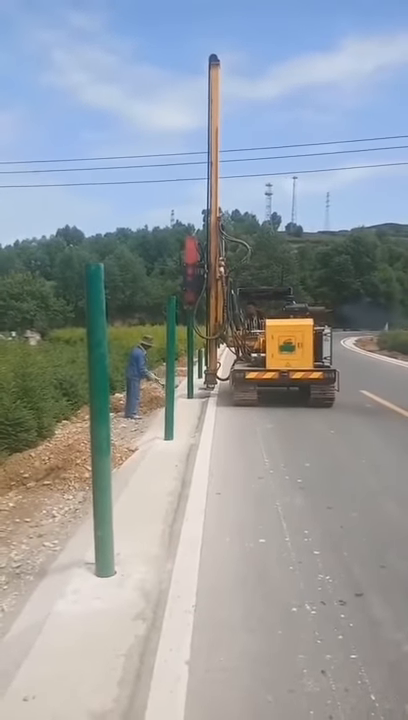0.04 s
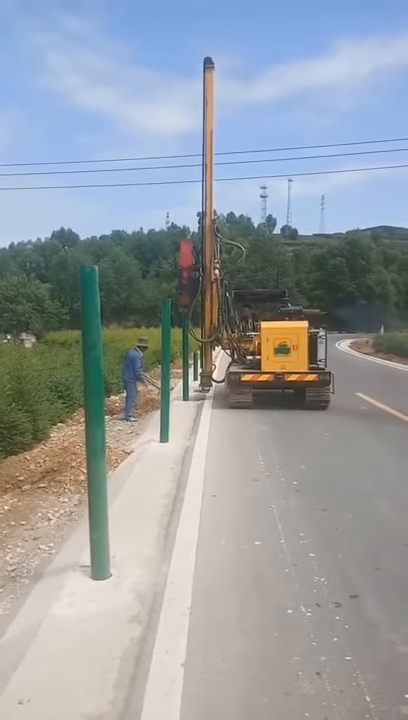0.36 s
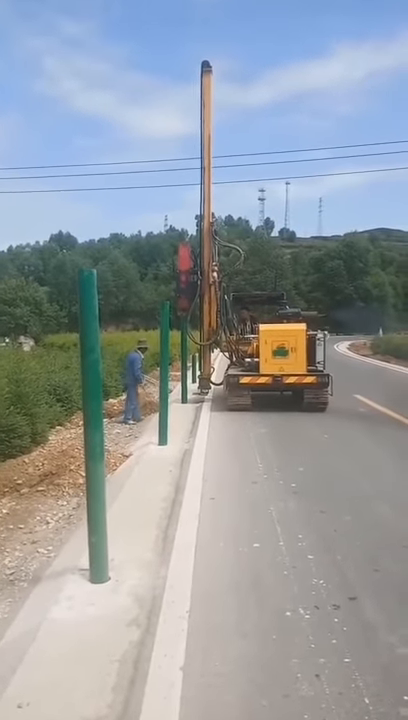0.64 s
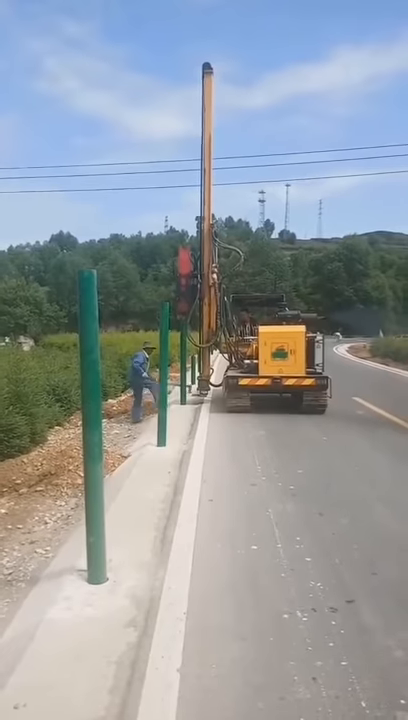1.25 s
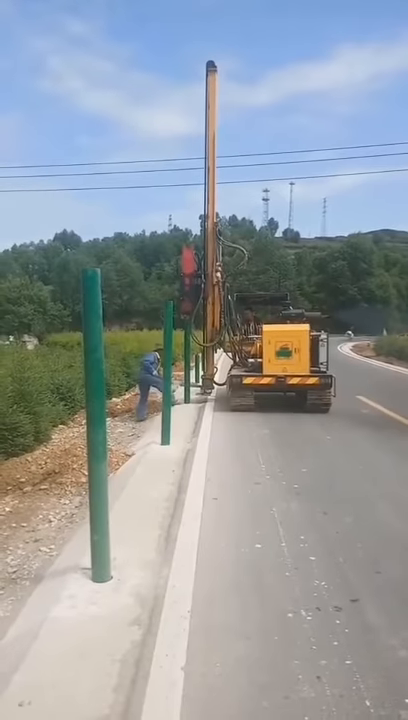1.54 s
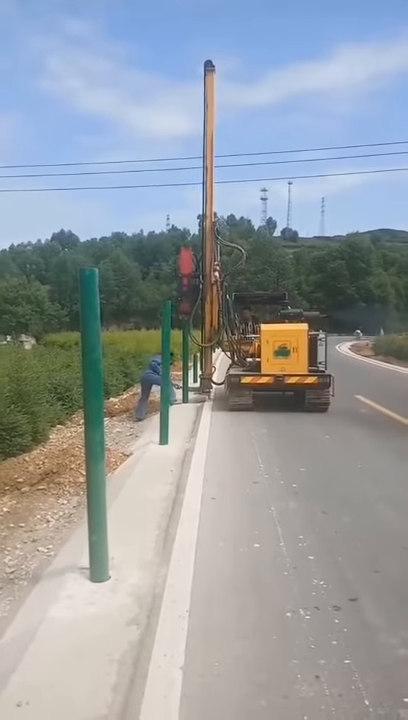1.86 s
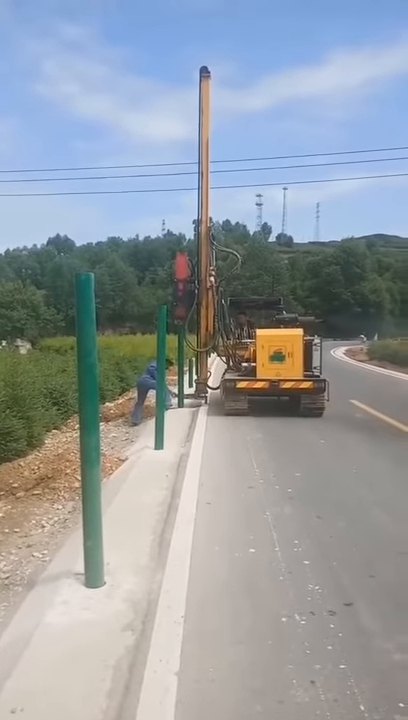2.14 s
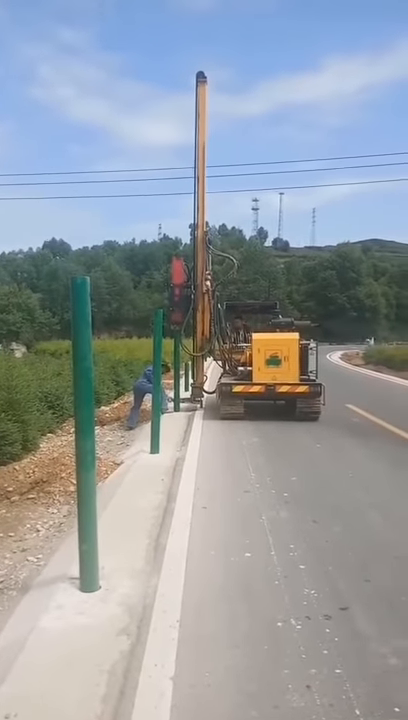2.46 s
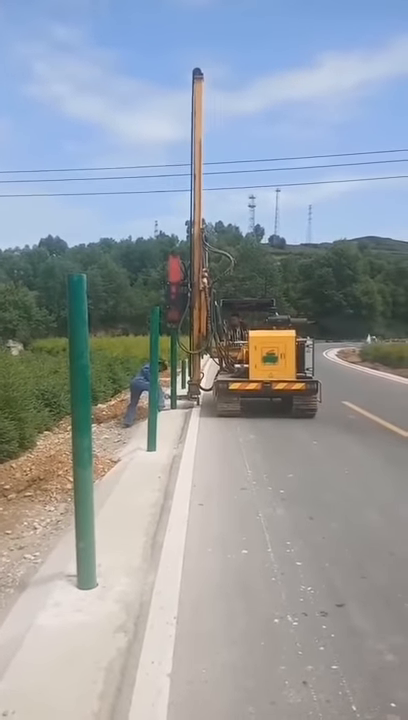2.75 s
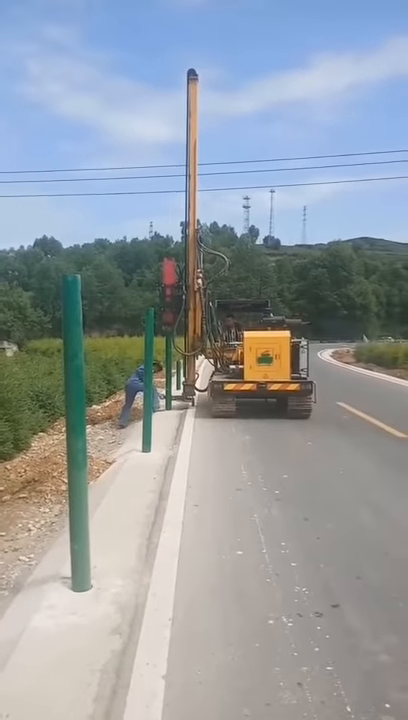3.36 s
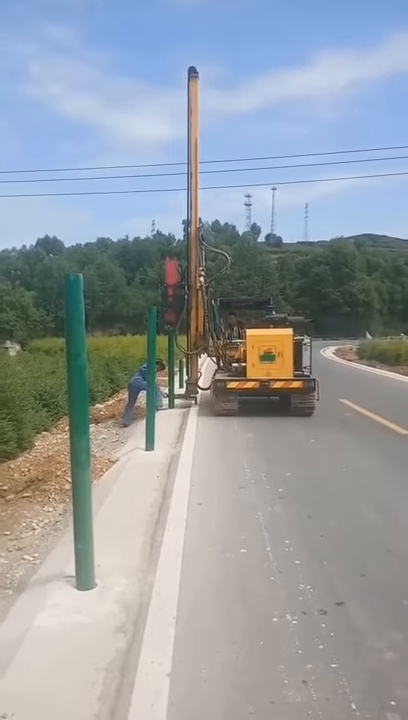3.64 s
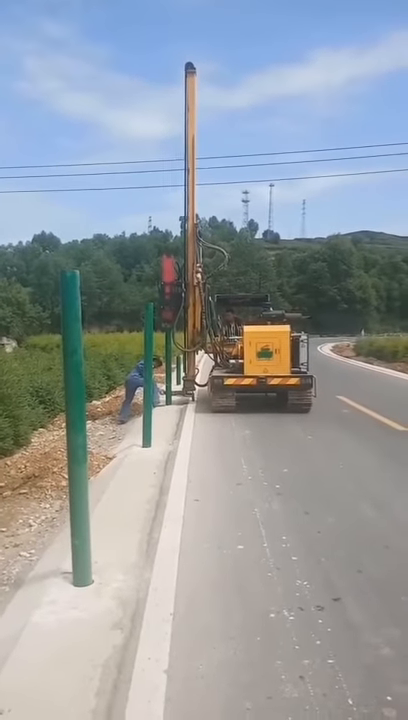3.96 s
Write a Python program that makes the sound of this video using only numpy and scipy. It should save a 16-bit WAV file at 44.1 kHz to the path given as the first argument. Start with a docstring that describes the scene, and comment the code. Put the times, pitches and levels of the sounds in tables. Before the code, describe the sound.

A hydraulic post driver hammers rapidly on a steel post over running diesel engines.

```python
"""Post driver at the roadside

Some way off, straight ahead of the microphone, a hydraulic rig drives a steel tube post, about ten
blows a second. Each blow cracks, clatters through post and mast, and lets a 1 kHz ring swell until
the next blow chokes it. Behind it two diesels rev up and settle over the rush of the hydraulics.
The recorder's limiter ducks everything at the blows."""
import sys
import numpy as np
from scipy import signal
from scipy.fft import rfft, irfft
from scipy.io import wavfile
from scipy.ndimage import uniform_filter1d

SR = 44100
rng = np.random.default_rng(int(sys.argv[2]) if len(sys.argv) > 2 else 0)


def store_wav(level_fs):
    """Save 16-bit WAV to argv[1]."""
    pcm = np.round(np.clip(np.atleast_2d(level_fs), -1, 1) * 32767)
    wavfile.write(sys.argv[1], SR, pcm.T.astype(np.int16))


N = 176400
TIME = np.arange(N) / SR

# Hammer blows. Each row: start in seconds, relative strength in dB, relative level of the ring in dB.
HAMMER_BLOWS = [(-0.055, 0.0, -19.5), (0.0574, -0.7, -19), (0.17, -3.3, -18), (0.2792, -4, -13.5),
                (0.3867, -1, -11), (0.4938, -1.5, -10.5), (0.5981, -3.5, -15.5), (0.7012, 1, -9),
                (0.8035, 0, -12), (0.9044, -2, -11.5), (1.005, -7.5, -12), (1.1086, -4, -12),
                (1.2098, -8, -17), (1.3109, -7.5, -16), (1.4123, -3.5, -23), (1.5124, -9, -22),
                (1.6104, -6, -21.0), (1.7079, -3, -16.5), (1.7966, -22.5, -19), (1.8812, -5.5, -15),
                (1.9802, -3, -23.5), (2.0762, -7.5, -24.5), (2.1768, -4.5, -18), (2.2729, -0.9, -16.0),
                (2.3721, -5.5, -16.5), (2.4692, -6, -17.0), (2.5661, -4.5, -17.5), (2.6638, -6.5, -17.0),
                (2.7621, -4, -20.5), (2.8587, -7.5, -28.5), (2.9557, -4.5, -26), (3.0522, -8.5, -22.0),
                (3.1498, -5, -20.5), (3.2472, -6.3, -22.0), (3.3423, -5, -17.5), (3.44, -0.5, -20),
                (3.537, -5.5, -29), (3.6349, -7.5, -20.5), (3.7313, 1, -20), (3.829, -2.5, -13.5),
                (3.9257, -2.2, -12.5)]
# Lasting modes of the steel. Each entry: pitch in Hz.
STEEL_MODES_HZ = [890, 2330, 2715, 2790, 4150, 5185, 5368, 5727]
# Colour of clattering steel. Each row: frequency in Hz, relative spectral density in dB.
CLATTER_SPECTRUM = [(300, -9.5), (500, -16), (750, -3.5), (1000, 6), (1300, -5), (1650, -9.5), (2100, -1),
                    (3000, -2), (3800, -5.5), (4500, -4), (5500, -4.5), (6300, -18.5)]


def from_db(db):
    """Decibels to gain."""
    return 10 ** (np.asarray(db) / 20)


def rms_one(x):
    """Scale to unit rms."""
    return x / np.sqrt(np.mean(x ** 2) + 1e-20)


def in_time(rows):
    """The columns of a curve at every sample."""
    times, *columns = np.transpose(rows)
    return [np.interp(TIME, times, column) for column in columns]


def noise(spectrum):
    """Noise of unit rms with the given colour."""
    hz, db = np.transpose(spectrum)
    bins = np.maximum(np.arange(N // 2 + 1) * SR / N, 1)
    colour = from_db(np.interp(np.log(bins), np.log(hz), db))
    return rms_one(irfft(rfft(rng.standard_normal(N)) * colour, N))


def drift(hz):
    """A random wander of unit rms, mostly slower than hz."""
    bins = np.arange(N // 2 + 1) * SR / N
    return rms_one(irfft(rfft(rng.standard_normal(N)) / (1 + (bins / hz) ** 2), N))


def mode(clicks, hz, t60):
    """A unit click sets a sine of height 1 ringing."""
    r, w = np.exp(-np.log(1000) / (t60 * SR)), 2 * np.pi * hz / SR
    return signal.lfilter([0, np.sin(w)], [1, -2 * r * np.cos(w), r * r], clicks + 1e-18)


def strikes(times, gains):
    """A click of the given size at each time."""
    out, inside = np.zeros(N), (times >= 0) & (times < (N - 1) / SR)
    out[(times[inside] * SR).astype(int)] = gains[inside]
    return out


def engine_lines(hz, orders, waver_db):
    """Engine tones on multiples of a rate, each wavering in level."""
    turn = 2 * np.pi * np.cumsum(hz) / SR
    out = np.zeros(N)
    for multiple, db in orders:
        height = np.sqrt(2) * from_db(db + waver_db * drift(2.7))
        out += height * np.sin(multiple * turn + rng.uniform(0, 2 * np.pi))
    return out


def hammer_impacts():
    """Every blow strikes the steel's short and lasting modes, each a little differently."""
    # Short modes. Each row: pitch in Hz, relative level in dB, t60 in seconds, delay in seconds.
    crack_modes = [(734, -22, 0.058, 0.00015), (1017, -2.5, 0.016, 0.00074), (1280, -4, 0.0053, .0009),
                   (1982, -7.5, 0.018, 0.0012), (2310, -6.5, 0.011, 0.001174), (3242, -13.5, 0.036, 0.0051),
                   (2873, -6.5, 0.011, .0042), (4158, -15.5, 0.028, 0.0019), (5470, -21, 0.019, .004),
                   (2970, -21, 0.071, .007)]
    # Lasting modes, as in STEEL_MODES_HZ. Each row: relative level in dB, t60 in seconds.
    steel_decays = [(-30.5, 0.31), (-35, 0.16), (-30.5, 0.35), (-19, 0.074), (-31, 0.28), (-37, 0.44),
                    (-31.5, 0.16), (-47.5, 0.49)]
    jitter_s, steel_delay_s = 0.00015, 0.0037
    starts, blow_db, _ = np.transpose(HAMMER_BLOWS)
    out = np.zeros(N)
    for k, (hz, level_db, t60, delay) in enumerate(crack_modes):
        size, late = rng.standard_normal((2, len(starts)))
        arrivals = starts + delay + (jitter_s + 0.14 * delay) * late  # later modes scatter more
        clicks = strikes(arrivals, from_db(blow_db + level_db + 3 * size))
        out -= (-1) ** k * mode(clicks, hz, t60)  # polarity alternates from mode to mode
    for hz, (level_db, t60) in zip(STEEL_MODES_HZ, steel_decays):
        size, late = rng.standard_normal((2, len(starts)))
        arrivals = starts + steel_delay_s + jitter_s * late
        out += mode(strikes(arrivals, from_db(blow_db + level_db + 5 * size)), hz, t60)
    return out


def mast_clatter():
    """Hammer and mast clatter after each blow: a quick, grainy burst and a longer tail."""
    rise_s, grain_db = 0.0037, 1
    starts, blow_db, _ = np.transpose(HAMMER_BLOWS)
    hit_power = strikes(starts, from_db(2 * blow_db))
    power = 0
    for level_db, t60 in ((-10, 0.06), (-13.5, 0.15)):  # burst, tail
        decay = np.exp(-2 * np.log(1000) / (t60 * SR))
        power += from_db(2 * level_db) * signal.lfilter([1], [1, -decay], hit_power + 1e-18)
    rise = np.exp(-1 / (rise_s * SR))
    envelope = np.sqrt(signal.lfilter([1 - rise], [1, -rise], power))
    return envelope * from_db(grain_db * drift(200)) * noise(CLATTER_SPECTRUM)


def post_ring():
    """The post's main tone swells after each blow and is choked as the hammer lands again."""
    ring_hz, t60, waver_db, slip_rad = 972.5, 1, 1.16, 0.59
    wait_s, swell_s, choke_s = 0.009, 0.055, 0.026
    starts, _, ring_db = np.transpose(HAMMER_BLOWS)
    ends = np.append(starts[1:], 2 * starts[-1] - starts[-2])
    blow = np.maximum(np.searchsorted(starts, TIME, side="right") - 1, 0)
    age = TIME - starts[blow]
    swell = np.sin(np.pi / 2 * np.clip((age - wait_s) / swell_s, 0, 1))
    decay = np.exp(-np.log(1000) * age / t60)
    choke = np.clip((ends[blow] - TIME) / choke_s, 0, 1)
    # The phase wanders, and jumps at each blow.
    slip = slip_rad * (drift(12) + 2 * rng.standard_normal(len(starts))[blow])
    tone = np.sqrt(2) * np.sin(2 * np.pi * ring_hz * TIME + slip)
    return from_db(2.5 + ring_db[blow] + waver_db * drift(52)) * swell * decay * choke * tone


def cap_scrape():
    """The hammer rubs the post cap as it comes down, with a different strength each time."""
    lead_s, fade_s = 0.00065, 0.0027
    starts = np.transpose(HAMMER_BLOWS)[0]
    rubs = strikes(starts - lead_s, from_db(3 * rng.standard_normal(len(starts))))
    lag = np.arange(-SR // 20, SR // 20 + 1) / SR
    envelope = signal.fftconvolve(rubs, np.exp(-np.abs(lag) / fade_s), "same")
    return from_db(-21.5) * envelope * noise(CLATTER_SPECTRUM)


def valve_spit():
    """The valve gives a short bright spit just before each blow."""
    lead_s, jitter_s, fade_s = 0.021, 0.00091, 0.0054
    centre_hz, width_hz = 5190, 2000
    starts = np.transpose(HAMMER_BLOWS)[0]
    size, late = rng.standard_normal((2, len(starts)))
    spits = strikes(starts - lead_s + jitter_s * late, from_db(4.6 * size))
    lag = np.arange(-SR // 20, SR // 20 + 1) / SR
    envelope = signal.fftconvolve(spits, np.exp(-(lag / fade_s) ** 2), "same")
    hiss = rms_one(mode(rng.standard_normal(N), centre_hz, t60=np.log(1000) / np.pi / width_hz))
    return from_db(-27) * envelope * hiss


def loose_parts():
    """Loose parts tick at random throughout, each tick on one of the steel's modes."""
    ticks_per_s = 360
    ticking = rng.random(N) < ticks_per_s / SR
    ticks = ticking * from_db(-36.5 + 3 * np.minimum(rng.exponential(1, N), 4))
    struck = rng.integers(0, len(STEEL_MODES_HZ), N)
    return sum(mode(ticks * (struck == k), hz, t60=0.03) for k, hz in enumerate(STEEL_MODES_HZ))


def revving_diesel():
    """The higher engine hums on its firing rate, which climbs and then holds."""
    # The run-up. Each row: time in seconds, firing rate in Hz, level in dB.
    revs = [(0, 108.7, -33.5), (.3, 111.7, -33), (.75, 120.6, -30.5), (1.05, 128.9, -40.5),
            (1.35, 136, -34.5), (1.7, 144.2, -41.5), (2.9, 144, -39), (4, 143.5, -35.5)]
    # Its tones. Each row: multiple of the firing rate, relative level in dB.
    orders = [(.5, -7), (1, 0), (1.5, -11), (2, -7), (3, -12)]
    firing_hz, level_db = in_time(revs)
    return from_db(level_db) * engine_lines(firing_hz, orders, waver_db=1.5)


def deep_diesel():
    """The deeper engine speeds up and settles; the exhaust throbs at its cycle and three times that."""
    # The run-up. Each row: time in seconds, cycle rate in Hz, level in dB.
    revs = [(0, 27, -43), (1.15, 29, -41), (1.7, 31.35, -36), (4, 31.35, -36)]
    # Its tones. Each row: multiple of the cycle rate, relative level in dB.
    orders = [(3, -7), (4, -8), (5, -9), (6, -8), (7, 0), (8, -5), (11, -10), (12, -10)]
    # Exhaust colour. Each row: frequency in Hz, relative spectral density in dB.
    exhaust_spectrum = [(25, -13), (48, -8.5), (70, -10.5), (110, 1.5), (160, 0), (230, 2.5), (340, 1),
                        (430, -4.5), (520, -13), (800, -6.5), (2000, -54.5)]
    # Exhaust loudness. Each row: time in seconds, level in dB about which it throbs.
    exhaust_levels = [(0, -31), (.9, -29.5), (1.4, -28.5), (2.2, -30.5), (3, -30.5), (4, -28)]
    cycle_hz, level_db = in_time(revs)
    tones = from_db(level_db) * engine_lines(cycle_hz, orders, waver_db=3)
    cycle = 2 * np.pi * np.cumsum(cycle_hz) / SR
    throb_db = 3.5 * np.cos(cycle) + 2.2 * np.cos(3 * cycle)
    exhaust = from_db(in_time(exhaust_levels)[0] + throb_db) * noise(exhaust_spectrum)
    return tones + exhaust


def hydraulic_rush():
    """Hydraulics and engine clatter merge into a flickering rush."""
    # Its colour. Each row: frequency in Hz, relative spectral density in dB.
    rush_spectrum = [(300, -1.5), (520, -8), (700, 9), (900, 10), (1150, 10.5), (1600, 6), (2300, 6),
                     (3300, 8), (3900, 3.5), (4700, 1.5), (5500, -1.5), (6300, -16.5)]
    return from_db(-32.5 + 2.5 * drift(63)) * noise(rush_spectrum)


def scene():
    """The rig stands straight ahead of the microphone, alike in both channels."""
    blows = from_db(7.5) * (hammer_impacts() + mast_clatter()) + cap_scrape() + post_ring()
    rig = blows + loose_parts() + valve_spit() + revving_diesel() + deep_diesel() + hydraulic_rush()
    return np.array([rig, rig])


def record(dry):
    """The recorder: low cut, look-ahead limiter, one lurch to the left, rounded peaks, steep top cut."""
    low_cut_hz, top_cut_hz, ceiling = 61, 6300, 0.95
    threshold_db, release_db_per_s, window_s, ahead_s = -14.5, 175, 0.0032, 0.002
    lurch_at_s, lurch_db, lurch_fade_s = 3.4415, 33, 0.0036
    dry = signal.sosfilt(signal.butter(2, low_cut_hz, "high", fs=SR, output="sos"), dry)
    power = uniform_filter1d(dry[0] ** 2, int(window_s * SR))
    level_db = 10 * np.log10(np.maximum(power, 1e-12))
    reduction_db = 0.9 * np.maximum(level_db - threshold_db, 0)
    release_db = release_db_per_s * TIME
    held_db = np.maximum.accumulate(reduction_db + release_db) - release_db
    duck_db = uniform_filter1d(np.interp(TIME + ahead_s, TIME, held_db), int(2 * ahead_s * SR))
    # One crack jumps out on the left.
    lean = from_db(lurch_db * np.exp(-((TIME - lurch_at_s) / lurch_fade_s) ** 2))
    pan = 2 * np.array([lean, np.ones(N)]) / (1 + lean)
    rounded = ceiling * np.tanh(dry * from_db(-duck_db) * pan / ceiling)
    return signal.sosfilt(signal.ellip(10, 0.2, 80, top_cut_hz, fs=SR, output="sos"), rounded)


dry = scene()
out = record(dry)
store_wav(out)
```